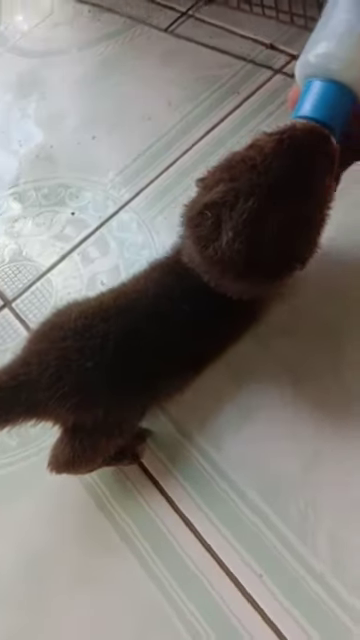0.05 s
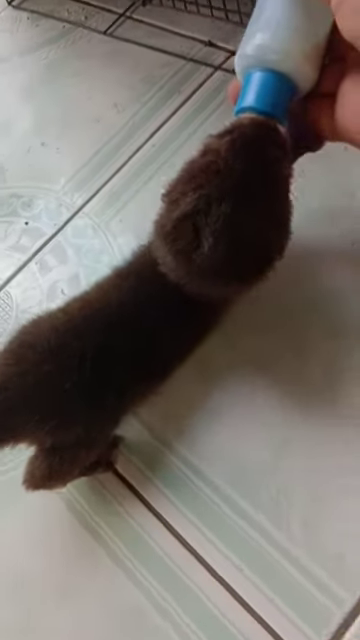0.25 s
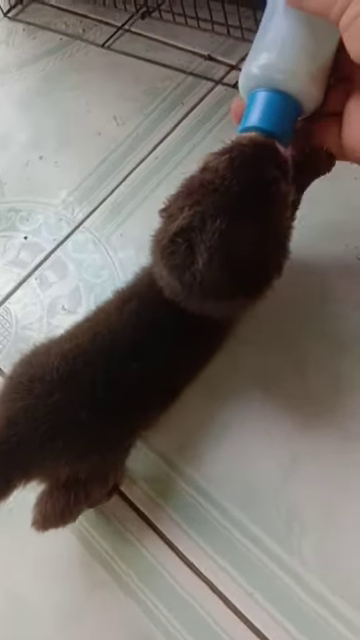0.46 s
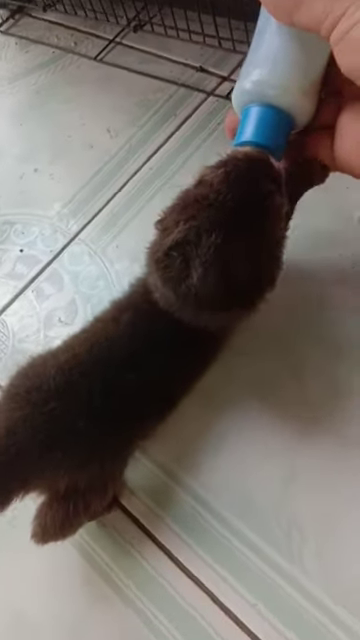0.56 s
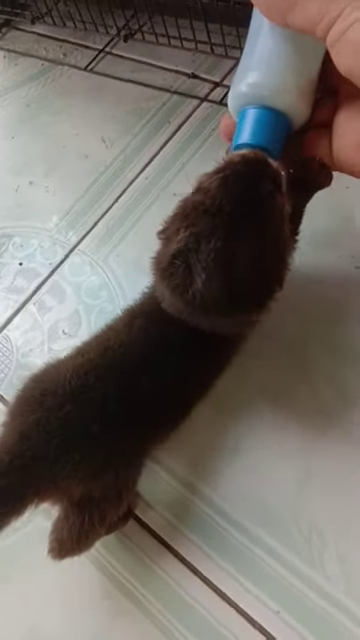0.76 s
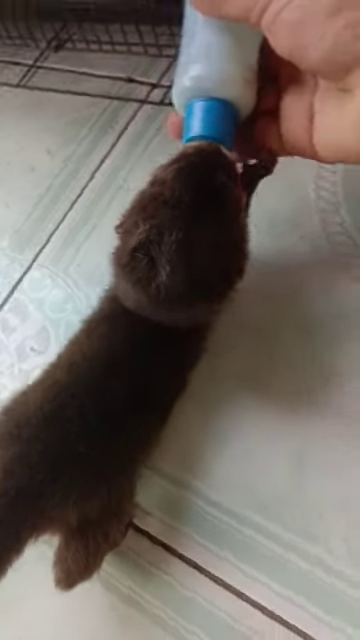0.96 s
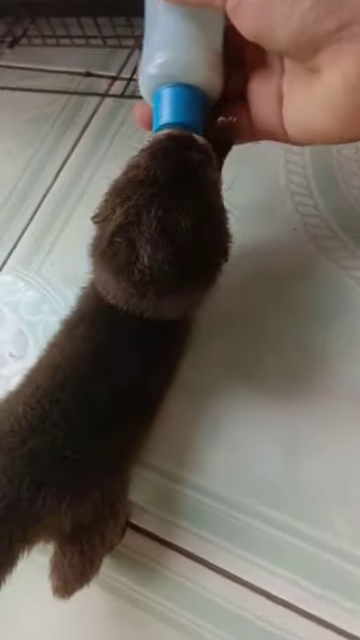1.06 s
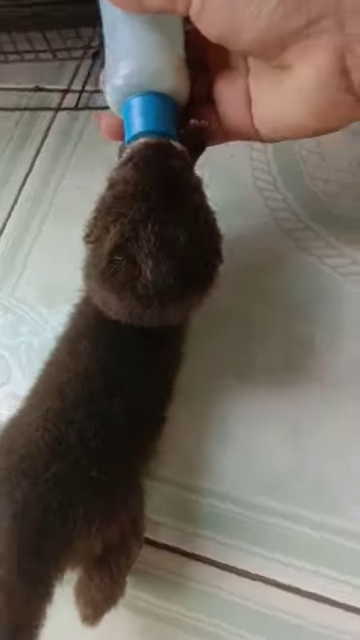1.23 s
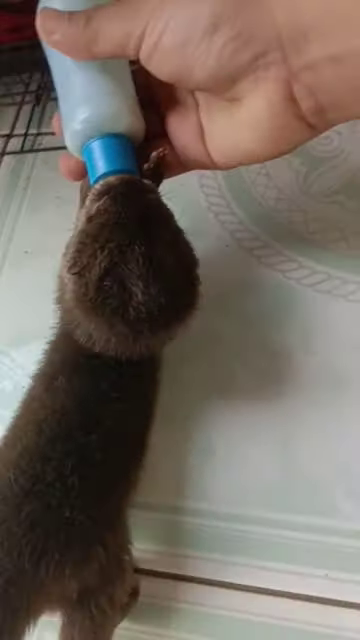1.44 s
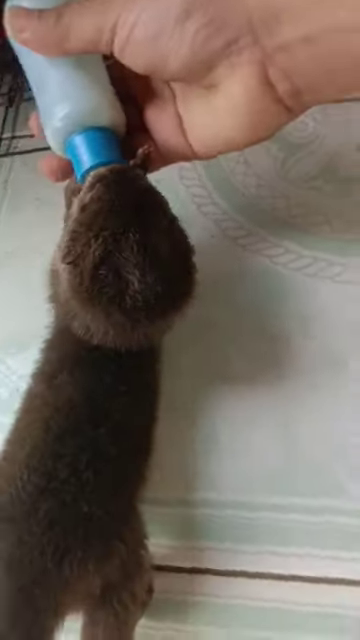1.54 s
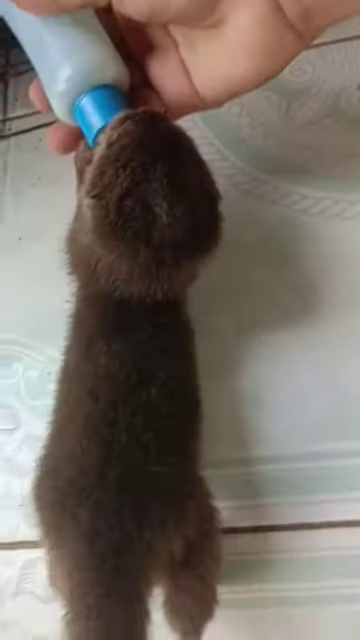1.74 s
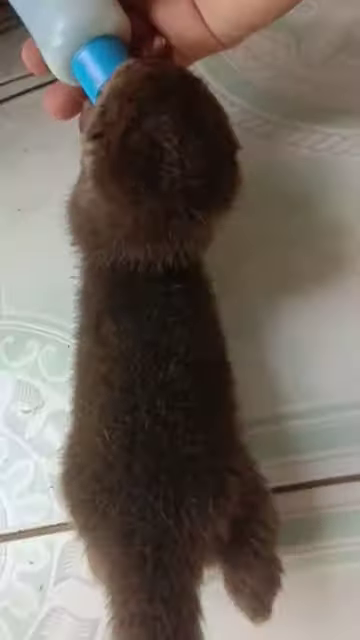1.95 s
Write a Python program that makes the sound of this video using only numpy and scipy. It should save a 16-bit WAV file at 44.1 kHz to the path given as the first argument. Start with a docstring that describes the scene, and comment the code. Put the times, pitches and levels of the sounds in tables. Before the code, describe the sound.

An otter pup squeals four times in a small tiled room, each high, slightly rough call rising and falling. A short squeal comes at 0.2 seconds, longer wavering ones from 0.4 to 0.7 and 1.0 to 1.3, and a brief, softer one at 1.7. Faint thin whistles drift between them, with soft low bumps around 0.8, 1.0 and 1.5 seconds, over quiet steady room noise.

```python
"""An otter pup squeals four times while it is bottle-fed on the tiled floor of a small room.
Each squeal is an arching, slightly rough tone whose harmonics sweep through the throat's resonances.
Around the squeals: faint thin whistles, a few soft low bumps and quiet room noise."""
import sys
import numpy as np
from scipy import signal
from scipy.fft import rfft, irfft
from scipy.io import wavfile
from scipy.ndimage import uniform_filter1d, minimum_filter1d

SR = 44100
rng = np.random.default_rng(int(sys.argv[2]) if len(sys.argv) > 2 else 0)


def log_audio(samples):
    """Write samples as a 16-bit WAV file to the path given in sys.argv[1]."""
    # one column per channel
    frames = np.atleast_2d(samples).T
    # limit to full scale, then quantise
    limited = np.clip(frames, -1, 1)
    pcm = np.round(limited * 32767).astype(np.int16)
    wavfile.write(sys.argv[1], SR, pcm)


N = 88200
T = np.arange(N) / SR
FREQS_HZ = np.arange(N + 1) * SR / (2 * N)


def from_db(db):
    """Decibels to gain."""
    return 10 ** (np.asarray(db) / 20)


def unit_rms(x):
    """Scale to rms 1."""
    return x / np.sqrt(np.mean(x ** 2) + 1e-20)


def at_hz(table, hz, column=1):
    """Read a table column on a log-frequency axis."""
    table = np.array(table, float)
    return np.interp(np.log(np.maximum(hz, 1)), np.log(table[:, 0]), table[:, column])


def in_time(points):
    """Join (seconds, value) points by straight lines."""
    return np.interp(T, *np.transpose(points))


def gate(start_s, end_s, attack_s, release_s):
    """Rise from start_s, hold, fall after end_s."""
    return np.clip((T - start_s) / attack_s, 0, 1) * np.clip(1 - (T - end_s) / release_s, 0, 1)


def drift(rate_hz):
    """Random wobble up to rate_hz, rms 1."""
    lowpass = signal.butter(3, min(rate_hz, SR / 20), fs=SR / 8, output="sos")
    slow = signal.sosfilt(lowpass, rng.standard_normal(N // 4))
    return unit_rms(np.interp(np.arange(N, 2 * N) / 8, np.arange(N // 4), slow))


def shaped_noise(spectrum):
    """Noise shaped by (Hz, dB) points, rms 1."""
    white = rfft(rng.standard_normal(N), 2 * N)
    return unit_rms(irfft(white * from_db(at_hz(spectrum, FREQS_HZ)))[:N])


def noisy_tone(phase, width_hz):
    """Narrow noise band around a tone."""
    return (drift(width_hz) * np.cos(phase) + drift(width_hz) * np.sin(phase)) / np.sqrt(2)


def swell(start_s, length_s, hz, peak_db):
    """Short tone that rises quickly and dies away."""
    progress = np.clip((T - start_s) / length_s, 0, 1)
    envelope = np.sin(np.pi * progress ** 0.77) ** 2
    return from_db(peak_db) * envelope * np.sin(2 * np.pi * hz * (T - start_s))


def ringing(t60_s=0.23):
    """The room still rings from an earlier squeal."""
    # Each row: frequency in Hz, relative density in dB.
    spectrum = [(1000, -35), (1700, -6.5), (2200, -18.5), (3100, 8), (4300, -12), (7200, -5.5),
                (11000, -15.5), (13000, -45)]
    return from_db(-48.5) * 1000. ** (-T / t60_s) * shaped_noise(spectrum)


def room_noise():
    """Steady hush, strongest in the bass."""
    # Each row: frequency in Hz, relative density in dB.
    spectrum = [(25, -22.5), (60, -3), (95, 0), (300, -9.5), (500, -18), (1000, -20), (1800, -13),
                (4200, -20.5), (7000, -24), (12000, -30.5), (15000, -35.5)]
    return from_db(-68.5) * shaped_noise(spectrum)


def shimmer(count=14, swing_db=0.5):
    """Faint narrow treble bands, each wavering in level on its own."""
    # Lowest and highest band in Hz, before a random upward shift.
    span_hz = [4700, 10000]
    centres_hz = np.geomspace(*span_hz, count)
    centres_hz += np.gradient(centres_hz) * rng.random(count) / 2
    bands = 0
    for hz in centres_hz:
        gain = from_db(swing_db * drift(rate_hz=2)) / hz
        bands += gain * noisy_tone(2 * np.pi * hz * T, width_hz=70)
    return from_db(-70) * unit_rms(bands)


def whistles(fade_s=0.038):
    """Faint, breathy, slow glides; the narrower, the steadier the core."""
    # Each row: start and end in seconds, start and end pitch in Hz, width in Hz, level in dB.
    glides = [(-0.66, 0.29, 3170, 2840, 124, -60.5), (.02, 0.24, 5640, 5260, 100, -56),
              (0.7, 0.96, 2500, 2740, 115, -56.5), (0.9, 1.16, 2770, 3100, 8.6, -53.5),
              (0.65, 0.93, 5300, 5080, 140, -56.5), (1.37, 1.6, 5100, 5300, 140, -61.5),
              (1.475, 1.684, 5450, 5740, 170, -60.5), (1.75, 1.94, 5460, 5030, 159, -56.5),
              (1.9, 2.03, 1260, 1244, 46, -61.5), (1.8, 2.05, 2870, 2910, 43, -65)]
    sound = 0
    for start_s, end_s, start_hz, end_hz, width_hz, db in glides:
        phase = 2 * np.pi * np.cumsum(in_time([(start_s, start_hz), (end_s, end_hz)])) / SR
        core_share = np.exp(-width_hz / 25)
        core = np.sqrt(core_share) * np.sin(phase)
        breath = np.sqrt(1 - core_share) * noisy_tone(phase, width_hz)
        sound += from_db(db) * gate(start_s, end_s - fade_s, fade_s, fade_s) * (core + breath)
    return sound


def side_notes():
    """The pup's short extras: a peep, a low crack, a second tone in the last squeal."""
    # Each row: start and length in seconds, pitch in Hz, peak in dB.
    notes = [(0.214, 0.0074, 2900, -44), (1.325, 0.017, 821, -43), (1.702, 0.056, 2298, -29.5)]
    return sum(swell(*row) for row in notes)


def tract_db(hz, mouth_hz, peak_db=20.5, width_hz=785):
    """Throat response plus the piercing mouth resonance."""
    # Each row: frequency in Hz, gain in dB.
    throat = [(900, -1), (1450, -6.5), (2200, -7.5), (3000, 3.5), (3600, -1.5), (4700, -11), (5800, -5.5),
              (9000, -13), (9700, -17), (10400, -13), (11100, -22.5), (11950, -17), (12600, -25),
              (13350, -19.5), (15500, -36.5)]
    return at_hz(throat, hz) + peak_db * np.exp(-.5 * ((hz - mouth_hz) / width_hz) ** 2)


def hoarseness(edge_s=0.0026):
    """Gains of rasp and of half-tones (between the harmonics) where the voice breaks."""
    # Each row: start and end in seconds, rasp in dB, half-tones in dB.
    stretches = [(.451, .458, -13, -13), (.55, .66, -28, -23), (1.04, 1.057, -18, -4),
                 (1.06, 1.128, -20, -14), (1.255, 1.28, -20, -20), (1.698, 1.727, -16, -14)]
    return sum(from_db(levels_db)[:, None] * gate(start_s, end_s, edge_s, edge_s)
               for start_s, end_s, *levels_db in stretches)


def squeal(pitch, loudness, level_db, tilt_db, jitter, rasp_db, dulling_s, mouth_hz, accent_db):
    """Harmonics of a jittering pitch pass through throat and mouth, with rasp and half-tones."""
    # Source level of harmonics 1, 2, .. in relative dB.
    harmonics_db = [9, 3.5, 1.5, 1, -6, -3.5, -7, -11.5, -6, -4]
    # Start and end in Hz of the range over which those levels even out.
    flatten_hz = [7700, 11000]
    # Faint broadband hiss during each squeal. Each row: frequency in Hz, relative density in dB.
    hiss_spectrum = [(60, -7.5), (600, -5.5), (1600, -16.5), (3200, -2.5), (5500, 3), (11000, 2.5),
                     (15000, -11)]
    attack_s, release_s, accent_s, hold_s = .004, .005, .015, 0.0091
    start_s, end_s = pitch[0][0], pitch[-1][0]
    hz = uniform_filter1d(in_time(pitch), size=130)
    roughness = (1710 / hz) ** 0.71  # rougher as the pitch falls
    hoarse, half_tones = hoarseness()
    shake = (jitter * roughness + 0.16 * hoarse) * drift(rate_hz=367)
    waver = .7 * jitter * roughness * drift(rate_hz=110)
    phase = 2 * np.pi * np.cumsum(hz * (1 + (shake + waver) / np.sqrt(2))) / SR
    dulling = np.clip((end_s - T) / dulling_s, 0, 1)
    closing_db = accent_db * gate(end_s - accent_s, end_s, attack_s, release_s)
    tone, power = 0, 0
    for k, db in enumerate(harmonics_db, 1):
        octaves = np.log2(k)
        source_db = db * np.interp(k * hz, flatten_hz, [1, 0]) + tilt_db * octaves
        source = from_db(source_db + closing_db * (k == 2)) * dulling ** octaves * (k * hz < SR * .4)
        flicker_db = 2.58 * octaves * drift(rate_hz=68)
        gain = source * from_db(tract_db(k * hz, mouth_hz) + flicker_db)
        half_gain = source * half_tones * from_db(tract_db((k + .5) * hz, mouth_hz))
        rasp = (from_db(rasp_db) * roughness + hoarse) * k ** 0.19
        tone += gain * (np.sin(k * phase) + rasp * noisy_tone(k * phase, width_hz=650))
        tone += half_gain * noisy_tone((k + .5) * phase, width_hz=100)
        power += (gain ** 2 * (1 + rasp ** 2) + half_gain ** 2) / 2
    # The pup holds its loudness over hold_s; faster resonances flash through.
    tone /= np.sqrt(uniform_filter1d(power, size=int(hold_s * SR)))
    hiss = from_db(-24) * shaped_noise(hiss_spectrum)
    voiced = gate(start_s - attack_s / 2, end_s, attack_s, release_s)
    return from_db(in_time(loudness) + level_db) * voiced * (tone + hiss)


def squeals():
    """The pup's four arching calls."""
    # One list per squeal. Each point: time in seconds, pitch in Hz.
    pitches = [
        [(.235, 1410), (.242, 1688), (.245, 1378), (.252, 1585), (.259, 2776), (.263, 3648), (.269, 4400),
         (.275, 4494), (.281, 4163), (.29, 2976), (.298, 2250), (.316, 1689), (.326, 1520)],
        [(.443, 1408), (.452, 1540), (.458, 2738), (.462, 3698), (.468, 4316), (.474, 4580), (.482, 4014),
         (.492, 3664), (.497, 2741), (.512, 2360), (.527, 2230), (.544, 2363), (.563, 3000), (.577, 3015),
         (.591, 2670), (.626, 2147), (.68, 1716), (.688, 1521), (.7, 1430)],
        [(1.041, 1260), (1.057, 1289), (1.08, 1770), (1.105, 2300), (1.12, 3160), (1.134, 3480), (1.158, 4202),
         (1.172, 5020), (1.183, 5150), (1.199, 4970), (1.212, 4130), (1.231, 3660), (1.244, 3598),
         (1.258, 3278), (1.268, 2626), (1.294, 1959), (1.327, 1500), (1.338, 1252)],
        [(1.671, 1664), (1.68, 1560), (1.696, 1970), (1.699, 2370), (1.714, 2340), (1.718, 1938), (1.727, 1699)],
    ]
    # One list per squeal. Each point: time in seconds, level in dB.
    levels = [
        [(0.237, -30), (0.247, -24), (0.289, -15.5), (0.322, -29)],
        [(0.445, -28.5), (0.459, -20), (0.501, -16.5), (0.511, -24.5), (0.537, -25.5), (0.551, -17),
         (0.579, -16), (0.623, -25.5), (0.661, -20), (0.673, -28.5), (0.689, -15), (0.698, -21.5)],
        [(1.043, -32), (1.065, -29.5), (1.099, -32), (1.121, -20.5), (1.145, -24.5), (1.165, -37), (1.187, -24),
         (1.199, -34), (1.257, -20), (1.293, -28), (1.323, -20), (1.338, -35.5)],
        [(1.672, -35.5), (1.686, -31), (1.697, -32.5), (1.704, -27.5), (1.724, -27.5)],
    ]
    # Each row: level offset in dB, tilt in dB/octave, relative pitch jitter, rasp in dB, final overtone
    # fade in seconds, mouth resonance in Hz, closing accent on harmonic 2 in dB.
    voices = [(0, 0.5, 0.012, -26, 0.0075, 8020, 0), (-0.64, 0.84, 0.0057, -30, 0.0059, 8000, 10.5),
              (-1.5, -1, 0.017, -31, 0.0082, 7700, -1), (-2.5, -4, 0.01, -19, 0.0013, 7900, 7.5)]
    return sum(squeal(pitch, loudness, *voice) for pitch, loudness, voice in zip(pitches, levels, voices))


def tiled_room(sound, early_db=-11, early_t60_s=0.071, first_wall_s=0.0036):
    """Add early reflections and a diffuse tail, flattened so that no pitch stands out."""
    # Each row: frequency in Hz, tail gain in dB, T60 in seconds.
    tail = [(720, -35.5, 0.33), (1620, -2, 0.26), (2370, -7, 0.32), (2800, -13, 0.42), (3600, -10, 0.28),
            (5140, -9.5, 0.37), (7500, -16.5, 0.27), (14000, -14, 0.32)]
    edges_hz = np.geomspace(500, 17000, 13)
    tail_noise, early_noise = rng.standard_normal((2, 2 * N))[:, :N] * (T > first_wall_s)
    response = 0
    for low_hz, high_hz in zip(edges_hz, edges_hz[1:]):
        hz = np.sqrt(low_hz * high_hz)
        band = (FREQS_HZ >= low_hz) & (FREQS_HZ < high_hz)
        late = (at_hz(tail, hz), at_hz(tail, hz, column=2), tail_noise)
        early = (early_db, early_t60_s, early_noise)
        for db, t60_s, noise in (late, early):
            echoes = rfft(noise * 1000. ** (-T / t60_s), 2 * N)
            local_rms = np.sqrt(uniform_filter1d(np.abs(echoes) ** 2, size=400))
            response += from_db(db) * band * echoes / local_rms
    return sound + signal.fftconvolve(sound, irfft(response)[:N // 2])[:N]


def bumps():
    """Soft low bumps, a few cycles each."""
    # Each row: start and length in seconds, pitch in Hz, peak in dB.
    pulses = [(0.838, 0.026, 98, -40), (1.031, 0.033, 96, -44), (1.5, 0.045, 76, -33),
              (1.508, 0.02, 165, -45), (1.596, 0.059, 118.5, -48.5), (1.619, 0.051, 76, -46.5)]
    return sum(swell(*row) for row in pulses)


def scene():
    """The pup in the room over a quiet background, mono."""
    pup = squeals() + side_notes()
    background = whistles() + bumps() + ringing() + room_noise()
    return (tiled_room(pup) + background + shimmer())[None]


def record(dry):
    """Fast peak limiter, then a steep low-pass."""
    ceiling, window_s, cutoff_hz = .37, .004, 15700
    size = int(window_s * SR)
    needed_gain = ceiling / np.maximum(np.abs(dry), ceiling)
    gain = uniform_filter1d(minimum_filter1d(needed_gain, size), size)
    return signal.sosfilt(signal.ellip(10, .2, 80, cutoff_hz, fs=SR, output="sos"), dry * gain)


dry = scene()
out = record(dry)
log_audio(out)
```